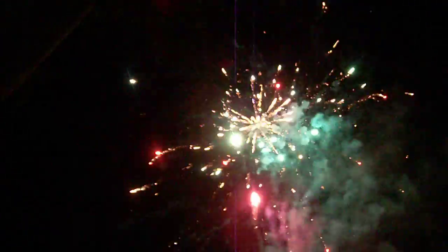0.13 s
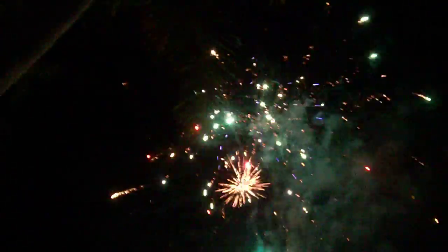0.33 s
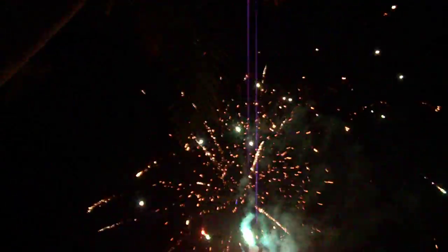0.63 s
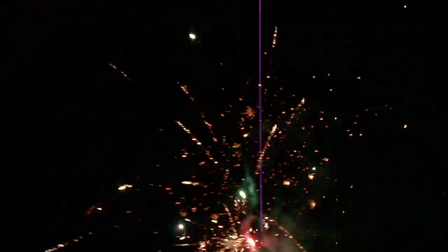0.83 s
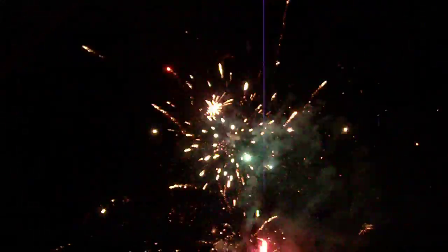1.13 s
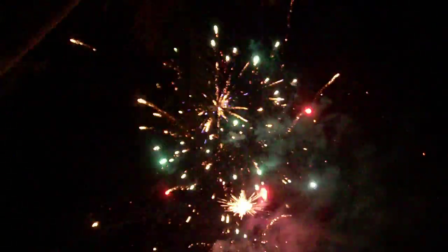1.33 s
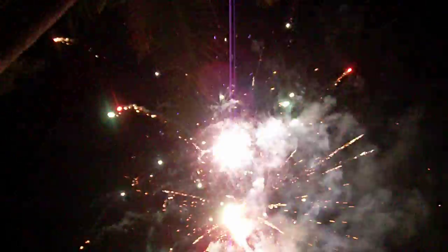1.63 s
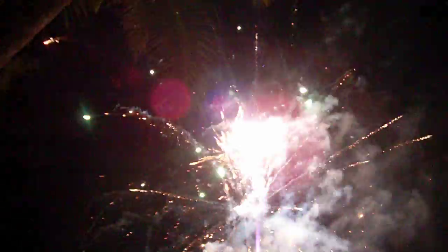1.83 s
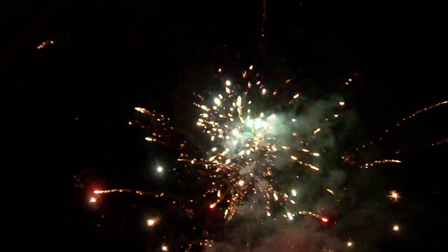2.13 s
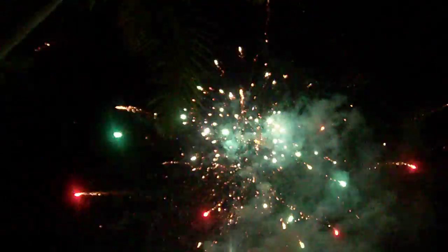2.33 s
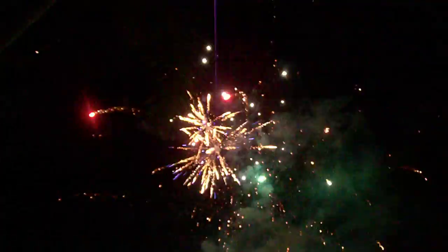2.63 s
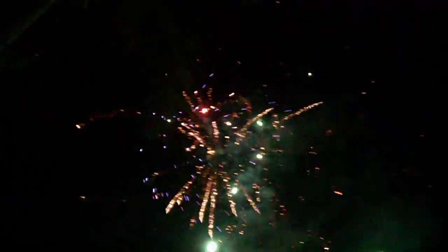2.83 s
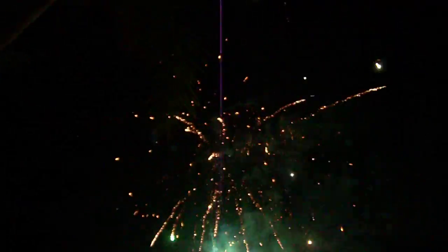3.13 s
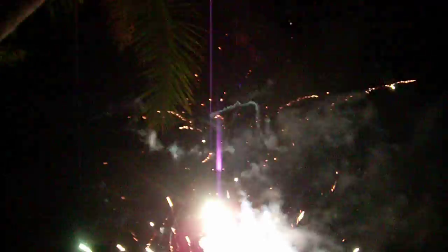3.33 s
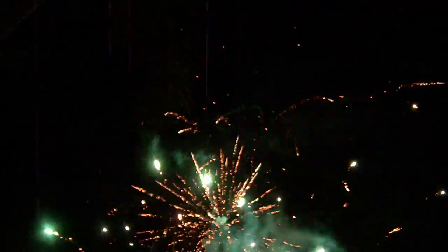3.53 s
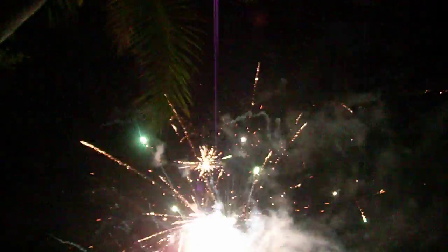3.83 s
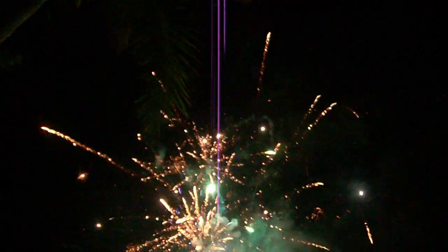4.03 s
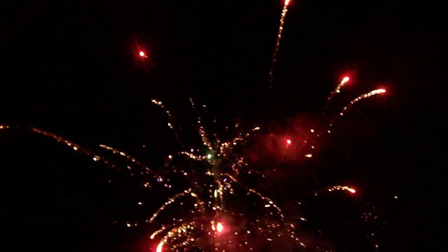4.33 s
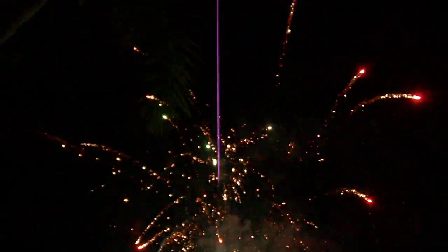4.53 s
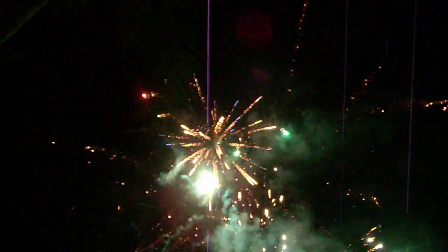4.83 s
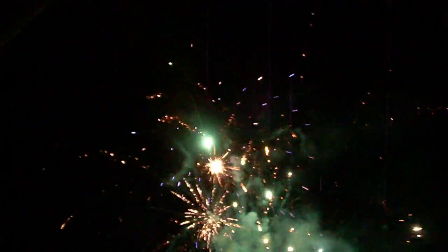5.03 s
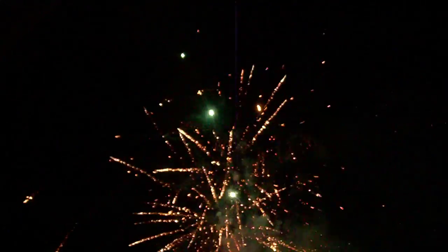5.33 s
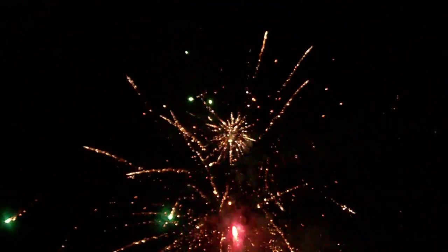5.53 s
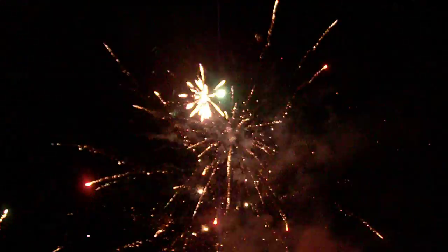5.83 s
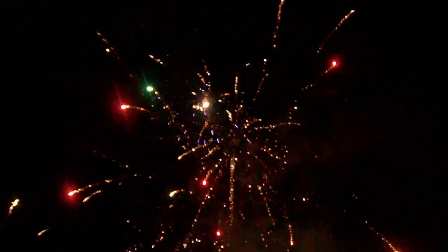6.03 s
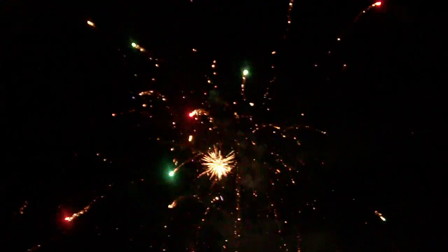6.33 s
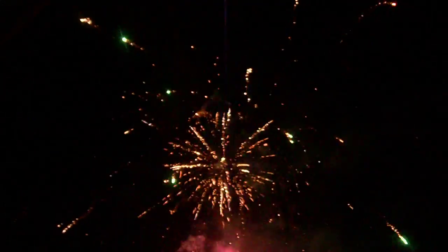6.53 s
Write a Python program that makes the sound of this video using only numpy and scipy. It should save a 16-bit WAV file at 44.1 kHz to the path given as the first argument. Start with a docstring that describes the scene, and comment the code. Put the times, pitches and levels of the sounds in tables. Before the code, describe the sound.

Fireworks go off almost without pause in the open at night. Hard shell cracks bounce off the ground and slap back from a wall about a tenth of a second later. Deep launch thumps and small snaps fall between them, over sizzling sparks, bursts of crackle and a rolling echo. The small microphone overloads, and each bang ducks the background.

```python
"""In the open at night, a fireworks display heard through a small overloaded microphone with gain control.
Mortars thump, shells crack overhead and pops snap: each is a blast wave with its scatter and echoes.
Each shell crack bounces off the ground and slaps back from a far wall.
Between the bangs, crackling stars and sizzling sparks are crowds of tiny blasts.
Filtered noise makes the rolling echo of the whole show and the deep rumble under it."""
import sys
import numpy as np
from scipy import signal
from scipy.fft import rfft, irfft, next_fast_len
from scipy.io import wavfile
from scipy.ndimage import minimum_filter1d

SR = 44100
rng = np.random.default_rng(int(sys.argv[2]) if len(sys.argv) > 2 else 0)


def put_to_file(sound):
    """Save the sound as 16-bit audio at rate SR, in the file named by the first command-line argument."""
    columns = np.atleast_2d(sound).T  # one column per channel
    safe = np.clip(columns, -1, 1)
    whole_steps = np.round(safe * 32767)
    wavfile.write(sys.argv[1], SR, whole_steps.astype(np.int16))


N = 294588
TIME = np.arange(N) / SR  # seconds

# Shell bursts, levels before the group trim; the slap level is relative to its burst:
# start_s, level_db, ground_lag_ms, wall_lag_ms, wall_slap_db
SHELL_BURSTS = [(0.0968, 0, 6.9, 106, -1), (.4057, 2, 6.6, 109.5, -2), (0.7997, 9, 5.7, 105, -13.5),
                (1.0496, 2.5, 7.3, 106, -1.5), (1.2621, 4, 7.6, 101, -4), (1.4085, 7, 6.5, 108, -6.5),
                (1.789, 2, 7.4, 106, -8), (1.8523, 3, 7.3, 112, -3.5), (1.9708, 2, 7, 110, -3.5),
                (2.573, 3.5, 7.3, 105, -2), (2.6058, 3.5, 7.5, 106, -1), (3.01, 5, 4.2, 111, -7),
                (3.4538, 11, 6, 107.5, -11), (3.694, 1.5, 6.6, 110, -5.5), (3.8788, -0.5, 7.5, 79, -35),
                (3.9561, 0, 5.9, 109, -9.5), (4.526, 3, 4.9, 111, -7.5), (4.7907, 0.5, 7.4, 107.2, 2.5),
                (5.052, 5.5, 6, 89, -14), (5.128, 1.5, 8.2, 108.0, 0.5), (5.5563, 1.5, 7.2, 107.5, 1.5),
                (5.8838, 4.5, 7.7, 108, -5.5), (6.4256, 3.5, 6.9, 108, 1)]
# Colour of a bounce off the ground: frequency_hz, gain_db
GROUND_COLOUR = [(100, 7), (500, 1.5), (2500, -2), (5000, 1.5), (12000, 0.5)]
# Colour of a slap off the wall: frequency_hz, gain_db
WALL_COLOUR = [(100, -9), (300, -12), (550, -0.5), (900, -0.5), (2500, -5), (5000, -6), (12000, -5.5)]


def shells(push_ms=0.31, ledge_ms=1.535, ledge_db=0.0, bounce_db=3.0, foreground_ms=3.5):
    """Each burst arrives directly, then off the ground, then off a stepped wall, mostly some 18 m behind."""
    direct, ground, wall = np.zeros((3, N))
    wave = blast(push_ms)
    for start_s, level_db, ground_ms, wall_ms, wall_db in SHELL_BURSTS:
        crack = wave + scatter(wave, decay_ms=2.1, level_db=-1.5)
        add(direct, start_s, from_db(level_db) * crack)

        bounce = wave + scatter(wave, decay_ms=9.6, level_db=-6.5)
        add(ground, start_s + ground_ms / 1000, from_db(level_db + bounce_db) * bounce)

        slap = from_db(level_db + wall_db) * wave
        wall_s = start_s + wall_ms / 1000
        add(wall, wall_s, slap + scatter(slap, decay_ms=0.4, level_db=1.0))
        add(wall, wall_s + ledge_ms / 1000, from_db(ledge_db) * slap)
        # things in front of the wall answer first
        early_s = wall_s - foreground_ms / 1000
        add(wall, early_s, scatter(slap, decay_ms=20.0, level_db=-2.0))
    return direct + colour(ground, GROUND_COLOUR) + colour(wall, WALL_COLOUR)


# Mortar shots, levels before the group trim: start_s, level_db, push_ms (length of the pressure push)
MORTAR_SHOTS = [(0.7837, 11.5, 0.46), (1.2084, -2.5, 0.71), (2.463, 5.5, 0.99), (3.417, 12.5, 0.85),
                (3.4428, 11, 0.42), (4.387, 3.5, 0.69), (5.0423, 1, 0.81), (6.2279, 12.5, 1)]
# Echoes off near surfaces around the mortars, relative to the shot: lag_ms, level_db
NEAR_ECHOES = [(2.2, -7.5), (3.9, -4.5), (6.1, -8)]


def mortars(echo_cut_hz=2400, boom_cut_hz=450):
    """Lifting charges at ground level: long heavy pushes, dull echoes and a short low boom close behind."""
    direct, echoes, boom = np.zeros((3, N))
    for start_s, level_db, push_ms in MORTAR_SHOTS:
        wave = from_db(level_db) * blast(push_ms)
        add(direct, start_s, wave + scatter(wave, decay_ms=2.8, level_db=-19.0))
        add(boom, start_s, scatter(wave, decay_ms=4.6, level_db=-3.5))
        for lag_ms, echo_db in NEAR_ECHOES:
            add(echoes, start_s + lag_ms / 1000, from_db(echo_db) * wave)
    return direct + dull(echoes, echo_cut_hz) + dull(boom, boom_cut_hz)


# Small charges and loud single stars, levels before the group trim:
# start_s, level_db, push_ms (length of the pressure push)
SINGLE_POPS = [(0.2138, -2, 0.68), (0.3851, -8.5, 0.4), (0.719, 3.5, 0.17), (1.164, -1, 0.56),
               (1.7236, 0.5, 0.28), (2.161, -10, 0.55), (2.2519, 4, 0.044), (2.348, 3.5, 0.068),
               (2.752, -1.5, 0.46), (3.003, -3.5, 0.34), (3.142, 4, 0.057), (3.2385, -4, 0.2),
               (3.3187, -3.5, 0.18), (3.988, -11, 0.37), (4.2744, 6, 0.12), (4.3683, -1, 0.047),
               (5.3523, -4, 0.17), (5.3681, -1.5, 0.22), (5.4432, -2.5, 0.24), (5.801, -2, 0.064),
               (6.1716, -6.5, 0.3)]


def pops():
    """Small charges and single stars each snap once and scatter briefly off rough surfaces."""
    out = np.zeros(N)
    for start_s, level_db, push_ms in SINGLE_POPS:
        wave = from_db(level_db) * blast(push_ms)
        add(out, start_s, wave + scatter(wave, decay_ms=12.5, level_db=2.5))
    return out


# Clouds of crackling stars, each a bell-shaped swell: peak_s, half_length_s, peak_level_db
STAR_CLOUDS = [(1.12, 0.3, -26), (2.25, 0.072, -21), (3.29, 0.061, -30), (4.284, 0.08, -18),
               (5.833, 0.035, -18.5), (6.3, 0.072, -22)]


def crackling_stars():
    """A cloud of stars goes off in separate sharp snaps, swelling and thinning out."""
    snaps = crackle(typical_per_s=580, spread_db=3.5, clump_db=-0.5, middle_push_ms=0.041)
    return swells(STAR_CLOUDS) * snaps


# Level curve of the sizzling sparks: time_s, level_db
SPARK_LEVEL = [(0, -29), (.35, -27), (.68, -30), (.86, -30.5), (1.7, -28), (1.92, -32.5), (2.1, -27.5),
               (2.55, -26), (2.78, -30), (2.9, -25.5), (3.15, -29), (3.55, -23), (3.82, -34), (4.48, -24),
               (4.7, -29.5), (5.5, -28.5), (5.7, -27.5), (6.68, -27)]


def sizzling_sparks():
    """Tiny blasts too dense to count fuse into a sizzle that rises and falls."""
    sizzle = crackle(typical_per_s=2400, spread_db=2.5, clump_db=3.0, middle_push_ms=0.031)
    return over_time(SPARK_LEVEL) * sizzle


# Level curve of the rolling echo between surges: time_s, level_db
ECHO_LEVEL = [(0, -30), (.28, -22.5), (.6, -24), (1.15, -24), (1.6, -22.5), (1.9, -26), (2.05, -25.5),
              (2.35, -33), (2.6, -24.5), (2.78, -25), (3.0, -22), (3.2, -26), (3.55, -20.5), (3.95, -29),
              (4.35, -26.5), (4.65, -24.5), (5.7, -24), (6.68, -24.5)]
# Bell-shaped surges of the deep rumble: peak_s, half_length_s, peak_level_db
RUMBLE_SURGES = [(.74, 0.11, -32.5), (2.53, 0.072, -34), (2.95, 0.074, -29.5), (3.38, 0.053, -36.5),
                 (5.51, 0.07, -36), (6.2, 0.052, -32), (6.67, .04, -36)]
# Spectrum of the rolling echo: frequency_hz, density_db (per Hz)
ECHO_SPECTRUM = [(50, -24.5), (100, -10), (170, 0.5), (300, 0), (550, -1), (850, 5.5), (1400, -3),
                 (2500, -8), (5000, -19), (12000, -68)]
# Spectrum of the deep rumble: frequency_hz, density_db (per Hz)
RUMBLE_SPECTRUM = [(12, -21), (28, 0), (58, -2), (90, -12), (160, -8), (500, -75)]


def distance(rumble_under_roll_db=-19.5, surge_in_roll_db=11):
    """A wash of far echoes with a deep rumble under it; the two surge together."""
    wash, surge = over_time(ECHO_LEVEL), swells(RUMBLE_SURGES)
    # powers add: surges reach up into the echo, and the rumble follows the echo in between
    roll_level = np.hypot(wash, from_db(surge_in_roll_db) * surge)
    rumble_level = np.hypot(from_db(rumble_under_roll_db) * wash, surge)
    roll = roll_level * rolling(ECHO_SPECTRUM, swell_db=2.5, per_s=90)
    rumble = rumble_level * rolling(RUMBLE_SPECTRUM, swell_db=5.0, per_s=14)
    return roll + rumble


def blast(push_ms, size=2048):
    """Blast wave: a sudden jump in pressure, then a longer, weaker suction."""
    age = (np.arange(size) + .5) / (push_ms * SR / 1000)  # in push lengths
    impulse = age * np.exp(-age)
    return np.diff(np.append(0, impulse)) / (age[1] - age[0])  # its slope is the pressure


def scatter(wave, decay_ms, level_db):
    """Rough surfaces return a dying cloud of small copies of a wave."""
    ms = np.arange(len(wave)) * 1000 / SR
    cloud = rng.standard_normal(len(wave)) * np.exp(-ms / decay_ms)
    cloud /= np.linalg.norm(cloud)
    return from_db(level_db) * signal.fftconvolve(wave, cloud)[:len(wave)]


def crackle(typical_per_s, spread_db, clump_db, middle_push_ms, bounce_db=-5.0, count=8):
    """Tiny blasts come in clumps; each height in the sky has its own ground bounce."""
    out = np.zeros(N)
    rate = typical_per_s * from_db(clump_db * drift(60))
    sizes = np.geomspace(.5, 2, count)
    bounce_lags_s = rng.uniform(.005, .008, count)
    for size, lag_s in zip(sizes, bounce_lags_s):
        born = rng.random(N) < rate / count / SR
        loudness_db = spread_db * np.minimum(rng.exponential(1, N), 3)  # a few stand out
        clicks = born * from_db(loudness_db)
        snaps = signal.oaconvolve(clicks, blast(middle_push_ms * size, size=256))[:N]
        out += snaps
        add(out, lag_s, from_db(bounce_db) * snaps)
    return rms_one(out)


def rolling(spectrum, swell_db, per_s):
    """Countless far echoes merge into an uneven wash: coloured noise with a drifting level."""
    wash = colour(rng.standard_normal(N), spectrum)
    return rms_one(wash * from_db(swell_db * drift(per_s)))


def drift(per_s):
    """Smooth chance of unit RMS, with per_s random turning points a second."""
    knots = rng.standard_normal(N // 100)
    return rms_one(np.interp(TIME * per_s, np.arange(len(knots)), knots))


def swells(rows):
    """Bell-shaped rises and falls, as a gain."""
    return sum(from_db(db) * np.exp(-.5 * ((TIME - s) / width_s) ** 2) for s, width_s, db in rows)


def over_time(curve):
    """A (time_s, level_db) curve as a gain at every sample."""
    return from_db(np.interp(TIME, *np.transpose(curve)))


def colour(x, points):
    """Causal (minimum-phase) filter with the given (frequency_hz, gain_db) response."""
    size = next_fast_len(2 * len(x))
    hz, db = np.transpose(points)
    log_hz = np.log(np.fft.rfftfreq(size, 1 / SR) + 1)  # 1 Hz up avoids log of zero
    log_gain = np.log(from_db(np.interp(log_hz, np.log(hz), db)))
    # keeping one side of the cepstrum puts the response after its cause
    cepstrum = irfft(log_gain, size)[:size // 2]
    response = np.exp(2 * rfft(cepstrum, size) - cepstrum[0])
    return irfft(rfft(x, size) * response, size)[:len(x)]


def dull(x, cut_hz):
    """Gentle first-order low-pass."""
    return signal.sosfilt(signal.butter(1, cut_hz, fs=SR, output="sos"), x + 1e-18)


def bass_drain(x, cut_hz):
    """Gentle first-order high-pass."""
    return signal.sosfilt(signal.butter(1, cut_hz, "high", fs=SR, output="sos"), x)


def from_db(db):
    """Decibels to gain."""
    return 10 ** (np.asarray(db) / 20)


def rms_one(x):
    """Scaled to unit power."""
    return x / np.sqrt(np.mean(x ** 2) + 1e-20)


def add(out, start_s, sound):
    """Mixes a sound in at start_s, cutting it where the output ends."""
    start = int(np.clip(round(start_s * SR), 0, len(out)))
    out[start:start + len(sound)] += sound[:len(out) - start]


def scene():
    """Bangs in front, over the crackle of the stars, the sizzle and the distant echoes."""
    bangs = from_db(7.0) * shells() + from_db(5.0) * mortars() + from_db(3.5) * pops()
    return (bangs + crackling_stars() + sizzling_sparks() + distance())[None]


# Peaks and dips of the microphone port and case: frequency_hz, q (sharpness, no unit), gain_db
MIC_RESONANCES = [(864, 9.6, 4), (1028, 3.38, -7.5), (1356, 12, 3.5), (1580, 2.55, -6), (2485, 2, 10),
                  (4760, 1.9, 10), (5835, 1.695, -19.5), (9590, 1.81, 24), (13400, 1.085, -29),
                  (15200, 2.0, -3.5)]


def microphone(x):
    """Port and case lift and dip bands of the sound, one bell filter each."""
    for hz, q, db in MIC_RESONANCES:
        w = 2 * np.pi * hz / SR
        height = from_db(db / 2)  # half the gain from each side of the filter
        damping = np.sin(w) / (2 * q) * np.array([1, 0, -1])
        tuning = np.array([1, -2 * np.cos(w), 1])
        x = signal.lfilter(tuning + damping * height, tuning + damping / height, x)
    return x


def port_delay(x, turn_hz=2100, q=0.91):
    """The port holds back the lows by a fraction of a millisecond, so a blast's snap leads its body."""
    w = 2 * np.pi * turn_hz / SR
    poles = np.array([1, -2 * np.cos(w), 1]) + np.sin(w) / (2 * q) * np.array([1, 0, -1])
    return signal.lfilter(poles[::-1], poles, x)  # all-pass: timing alone changes


def gain_control(x, threshold_db=-19.0, slope=0.71, depth_db=19, hold_s=.040,
                 fast_db_per_s=290, slow_db_per_s=26, slow_share=0.41):
    """A bang pulls the gain down to a limit; it holds, springs most of the way back, creeps up the rest."""
    sense_s, attack_s = .003, .005
    keep, ease = np.exp(-1 / (SR * np.array([sense_s, attack_s])))
    power = signal.lfilter([1 - keep], [1, -keep], x ** 2)
    level_db = 10 * np.log10(power + 1e-12)
    wanted_db = -slope * np.maximum(level_db - threshold_db, 0)
    half = int(hold_s * SR / 2)
    held_db = minimum_filter1d(wanted_db, 2 * half + 1, origin=half)  # looks back only
    deepest_db = np.maximum(held_db, -depth_db)
    # each recovery climbs at a steady rate until the next pull
    fast_climb, slow_climb = fast_db_per_s * TIME, slow_db_per_s * TIME
    fast_db = np.minimum.accumulate(deepest_db - fast_climb) + fast_climb
    slow_db = np.minimum.accumulate(slow_share * deepest_db - slow_climb) + slow_climb
    gain_db = signal.lfilter([1 - ease], [1, -ease], np.minimum(fast_db, slow_db))
    return x * from_db(gain_db)


def record(dry, bass_cut_hz=60, coupling_hz=35, top_cut_hz=16000):
    """The microphone colours, deep bass drains off, the gain ducks, peaks overload and the top is cut."""
    heard = bass_drain(port_delay(microphone(dry[0])), bass_cut_hz)
    clipped = np.clip(gain_control(heard), -1, 1)
    coupled = bass_drain(clipped, coupling_hz)
    top_cut = signal.ellip(10, .1, 80, top_cut_hz, fs=SR, output="sos")
    return signal.sosfilt(top_cut, coupled)[None]


dry = scene()
out = record(dry)
put_to_file(out)
```